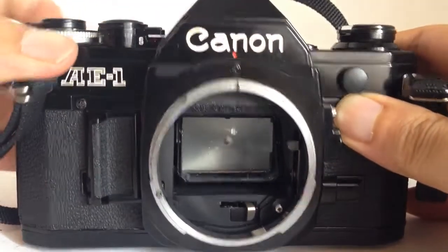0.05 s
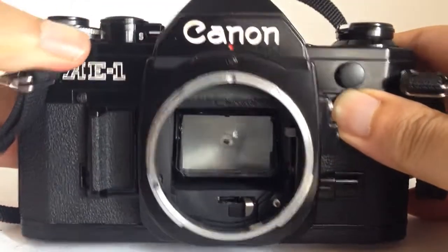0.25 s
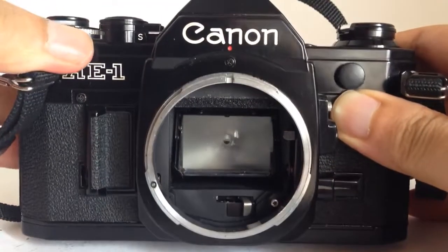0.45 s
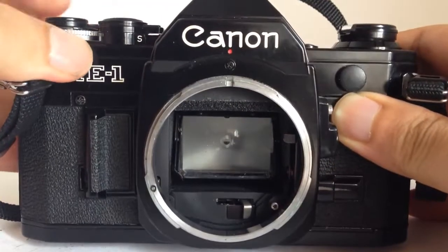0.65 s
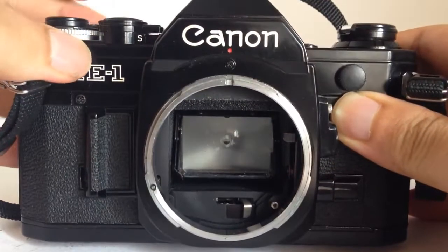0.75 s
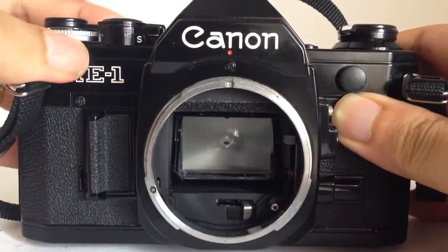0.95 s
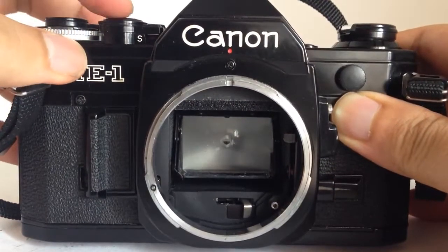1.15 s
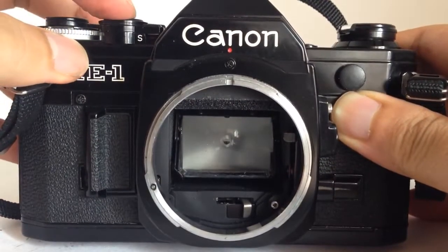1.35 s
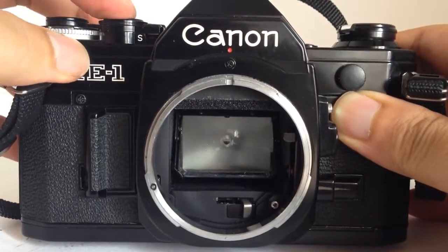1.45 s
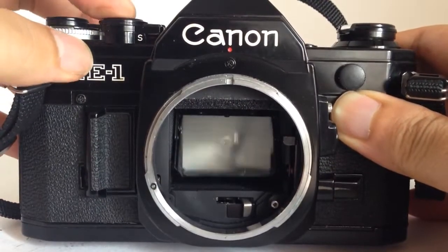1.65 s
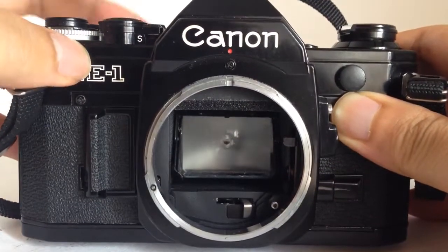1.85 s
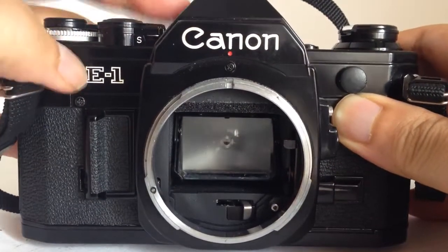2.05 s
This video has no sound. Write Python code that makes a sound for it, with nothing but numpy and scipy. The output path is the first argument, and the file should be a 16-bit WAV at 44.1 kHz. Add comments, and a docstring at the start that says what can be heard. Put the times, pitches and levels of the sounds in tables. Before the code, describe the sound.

A mechanical film camera is wound and fired, close up in a quiet room. After soft finger handling, the lever ratchets from 0.2 seconds to a hard stop at 0.45, leaving a faint spring ring. It clacks back at 0.75. Light taps follow, then a tiny button click at 1.25. At 1.65 the mirror and shutter snap sharply with a slight hollow thump, rattling until about 1.9.

```python
"""A mechanical film camera is wound and fired close to the microphone in a small quiet room.
Fingers handle the body, then the advance lever leaves its detent and drives ratcheting gears to their stop.
The lever springs back with a clack, fingers tap, and the button clicks down. Last, mirror and shutter snap
and rattle, and the button comes up. Each impact excites damped modes of the shell and the metal parts;
hard blows also set off a hollow boom and leave small springs singing."""
import sys
import numpy as np
from scipy import signal
from scipy.fft import rfft, irfft
from scipy.io import wavfile

SR = 44100
rng = np.random.default_rng(int(sys.argv[2]) if len(sys.argv) > 2 else 0)


def unload_audio(sound):
    """Save the sound as a 16-bit wav file, at the path given as the first command line argument."""
    columns = np.transpose(np.atleast_2d(sound))
    # keep every value between -1 and 1, then stretch to whole-number steps
    steps = np.round(np.clip(columns, -1, 1) * 32767)
    wavfile.write(sys.argv[1], SR, steps.astype(np.int16))


N = 92610
TIME = np.arange(N) / SR
ATTACK_S = 0.00031
# friction spectrum of fingers and gears: (frequency [Hz], relative density [dB])
RUBBING_SPECTRUM = [(60, -19.5), (290, 1), (450, -8), (720, -4.5), (1600, -10), (2250, -0.5), (3050, -12.5),
                    (4000, -5.5), (7000, -12.5), (8400, -5), (9600, -14), (15000, -15)]


def amp(db):
    """Amplitude ratio: a factor of ten for every 20 dB."""
    return 10 ** (np.asarray(db) / 20)


def unit(x):
    """Normalisation to an rms of 1."""
    return x / np.sqrt(np.mean(x ** 2) + 1e-20)


def read(points, hz):
    """Interpolation along a logarithmic frequency axis."""
    f, value = np.transpose(points)
    return np.interp(np.log(hz + 1), np.log(f + 1), value)


def shaped(x, spectrum):
    """Linear filtering: the spectrum of x is multiplied by a gain curve."""
    return irfft(rfft(x) * amp(read(spectrum, np.fft.rfftfreq(N, 1 / SR))), N)


def add(mix, s, sound):
    """Superposition: a sound joins the mix at time s."""
    part = mix[max(round(s * SR), 0):][:len(sound)]
    part += sound[:len(part)]


def air():
    """Background noise: the still room gives a random signal that is strongest in the bass."""
    spectrum = [(25, -19.5), (86, 0), (180, -13), (350, -15), (650, -26), (6000, -26), (15000, -28.5)]  # (frequency [Hz], relative density [dB])
    levels = [(1.6, -65.5), (1.95, -69)]  # (time [s], level [dB])
    noise = unit(shaped(rng.standard_normal(N), spectrum))
    return amp(np.interp(TIME, *np.transpose(levels))) * noise


def room(x, tail_db=-12.5, delay_s=.004):
    """Reverberation: a short diffuse tail follows the direct sound, its highest treble dying first."""
    decay_times = [(100, 0.26), (1000, 0.19), (6000, 0.21), (15000, 0.06)]  # (frequency [Hz], t60 [s])
    hz, t, noise = signal.stft(rng.standard_normal(SR // 2), SR, nperseg=256)
    t60 = read(decay_times, hz)[:, None]
    tail = noise * amp(tail_db - 60 * t / t60) * np.sqrt(2 * np.log(1000) / (t60 * SR))
    response = signal.istft(tail, SR, nperseg=256)[1]
    reverb = np.zeros(N)
    add(reverb, delay_s, signal.fftconvolve(x, response))
    return x + reverb


def ring(hz, db, t60, rise_s, phase=0):
    """Damped oscillation: one mode builds up, then decays exponentially."""
    t = TIME[:int(min(t60 * 1.2, 2) * SR)]
    return amp(db - 60 * t / t60) * (1 - np.exp(-t / rise_s)) * np.sin(2 * np.pi * (hz * t + phase))


def cluster(hz, db, t60, rise_s, count=20, spread_hz=240):
    """Beating: many close modes interfere and blur the pitch."""
    close_hz = hz + spread_hz * rng.triangular(-1, 0, 1, count)
    sound = sum(ring(f, db, t60, rise_s, rng.random()) for f in close_hz)
    return unit(sound) * np.std(ring(hz, db, t60, rise_s))


def click(contact_s, band_dbs):
    """Modal overlap: a brief contact shakes shell modes so dense that they decay as bands of noise."""
    bands = [(302, 746, 0.048), (907, 3200, 0.039), (2980, 8300, 0.026), (8930, 15000, 0.021)]  # low, middle, high, top: (lower edge [Hz], upper edge [Hz], t60 [s])
    t, out = TIME[:4096], 0
    for (lo, hi, t60), db in zip(bands, band_dbs):
        bandpass = signal.butter(3, [lo, hi], "band", fs=SR, output="sos")
        envelope = np.minimum(t / ATTACK_S, 1) * amp(-60 * np.maximum(t - contact_s, 0) / t60)
        burst = signal.sosfilt(bandpass, rng.standard_normal(2 * len(t)))[len(t):] * envelope
        rms = np.sqrt(np.sum(burst ** 2) / (.008 * SR))  # energy spread over 8 ms
        out = out + amp(db) * burst / rms
    return out


def blows(impacts, top_db, modes=(), t60=0.03, detune=0):
    """Impact excitation: the shell clicks into the room; the part's own modes are heard only close up."""
    # impacts: (time [s], contact [s], low band [dB], middle band [dB], high band [dB])
    # modes: (frequency [Hz], level [dB]); this level and top_db are relative to the high band
    shell_resonances = [(350, -3.5), (480, -9.5), (700, 1), (1150, 4.5), (1550, -2), (2200, 4.5),
                        (3000, -7.5), (4200, -3.5)]  # (frequency [Hz], gain [dB])
    clicks, rings = np.zeros((2, N))
    for s, contact_s, low_db, middle_db, high_db in impacts:
        add(clicks, s, click(contact_s, (low_db, middle_db, high_db, high_db + top_db)))
        for hz, db in modes:
            ring_s = t60 * (1000 / hz) ** 0.19  # t60 holds at 1 kHz; higher modes die sooner
            struck_hz = hz * (1 + detune * rng.uniform(-1, 1))  # detuned by where the blow lands
            add(rings, s, cluster(struck_hz, high_db + db, ring_s, contact_s / 4))
    return room(shaped(clicks, shell_resonances)) + rings


def friction(levels, spectrum, clump_db, ticks_per_s=15000, spread_db=2, clump_s=.002):
    """Stick-slip friction: tiny uneven ticks bunch up as teeth and sliding parts catch and slip."""
    sizes = amp(spread_db * np.minimum(rng.exponential(1, N), 4))
    ticks = sizes * rng.choice([-1, 1], N) * (rng.random(N) < ticks_per_s / SR)
    slip_times = np.arange(0, N / SR, clump_s)
    slip_strengths = np.minimum(rng.standard_normal(len(slip_times)), 2)
    clumps = amp(clump_db * np.interp(TIME, slip_times, slip_strengths))
    envelope = amp(np.interp(TIME, *np.transpose(levels), left=-140, right=-140))
    return room(envelope * unit(shaped(ticks * clumps, spectrum)))


def springs():
    """Free vibration: small springs and the back panel ring on after the hardest blows."""
    tones = [(0.446, 413, -36.5, .22), (0.446, 1125, -66, 4), (1.67, 640.5, -71, 4.5)]  # (time [s], frequency [Hz], level [dB], t60 [s])
    out = np.zeros(N)
    for s, hz, db, t60 in tones:
        add(out, s, ring(hz, db, t60, ATTACK_S))
    return out


def boom():
    """Resonance: each jolt of the whole body swells into a hollow low note and its overtone; the first row
    gives a low note already sounding as the scene begins."""
    jolts = [(.003, -40.5, -47.5), (0.082, -35.5, -47.5), (.146, -45.5, -42.5), (0.189, -39, -38),
             (0.291, -43, -51), (0.4343, -25, -25), (0.724, -39, -37.5), (0.7508, -28, -47),
             (0.9054, -39.5, -67.5), (0.976, -39, -55), (1.667, -36, -42.5), (1.711, -40.5, -30),
             (1.743, -30.5, -41), (1.7942, -30, -39.5), (1.8322, -34, -42.5)]  # (time [s], boom level [dB], overtone level [dB])
    out = np.zeros(N)
    for s, boom_db, overtone_db in jolts:
        add(out, s, ring(hz=137.6, db=boom_db, t60=.12, rise_s=.0058))
        add(out, s, ring(hz=133.25, db=boom_db - 16.5, t60=.42, rise_s=.0058))  # lingers in the room
        add(out, s, ring(hz=266.6, db=overtone_db, t60=.1, rise_s=.001))
    return out


def fingers():
    """Contact noise: light touches tap and rub the body."""
    taps = [(.0385, 0.00087, -46, -43.5, -78), (.1452, 0.0011, -38.5, -42.5, -39.5),
            (.160, 0.00083, -53.5, -46.5, -50), (.6725, 0.0016, -59, -48.5, -45),
            (.7112, 0.0053, -46, -45.5, -66), (.897, 0.0023, -53, -54, -64.5),
            (.971, 0.0053, -42, -50, -50), (1.950, 0.0025, -65.5, -57.5, -50.5)]  # (time [s], contact [s], low [dB], middle [dB], high [dB])
    rubbing = [(0, -57), (.064, -53.5), (.11, -56.5), (.185, -55)]  # (time [s], level [dB])
    return blows(taps, top_db=-16.5) + friction(rubbing, RUBBING_SPECTRUM, clump_db=4)


def button():
    """Impact excitation: the shutter button rings faintly going down and coming up."""
    strokes = [(1.2592, 0.00044, -68, -69, -52), (1.9295, 0.00051, -80, -61.5, -50.5)]  # (time [s], contact [s], low [dB], middle [dB], high [dB])
    modes = [(6150, 11.2)]  # (frequency [Hz], relative level [dB])
    return blows(strokes, top_db=-2.5, modes=modes)


def winding():
    """Impact and friction: the lever leaves its detent, pawls catch and the gears run into their stop."""
    # impacts: (time [s], contact [s], low [dB], middle [dB], high [dB])
    detent = [(.0803, 0.00035, -47, -46.5, -56.5)]
    pawls = [(.1748, 0.0031, -52, -55, -40), (.2180, 0.0055, -54, -41.5, -27),
             (.2293, .0006, -63, -42, -25.5), (.2592, 0.001, -39.5, -40.5, -28),
             (.353, 0.0028, -60, -57.5, -51.5), (.4243, .0006, -45.5, -52.5, -25.5),
             (.4305, 0.0024, -37, -43.5, -22.5), (.4358, 0.0039, -29.5, -30, -19)]
    end_stop = [(.4429, 0.0013, -32.5, -31, -14.5)]
    # resonances: (frequency [Hz], relative level [dB])
    detent_modes = [(2820, 18.5)]
    gear_modes = [(2215, -7.5), (3850, -7.5), (4300, -0.5), (4930, -5.5), (9750, 0.5)]
    turning = [(.17, -51.5), (.21, -47), (.25, -44), (.30, -65), (.34, -70), (.37, -49), (.383, -42),
               (.42, -35), (.448, -25.5), (.49, -61.5)]  # (time [s], level [dB])
    return (blows(detent, top_db=0, modes=detent_modes, t60=0.034)
            + blows(pawls, top_db=-6.5)
            + blows(end_stop, top_db=-3.5, modes=gear_modes, t60=0.054)
            + friction(turning, RUBBING_SPECTRUM, clump_db=3.5))


def lever_return():
    """Elastic restoring force: the lever springs back, sliding until it strikes its rest and rings."""
    impact = [(.7442, 0.002, -37, -32, -20)]  # (time [s], contact [s], low [dB], middle [dB], high [dB])
    modes = [(1120, 4), (2050, 2.5), (4520, 6.5), (5250, 8), (6780, 12.5), (7760, 12), (9900, 6),
             (11900, 3)]  # (frequency [Hz], relative level [dB])
    sliding = [(.655, -60.5), (.70, -58), (.748, -28), (.79, -67)]  # (time [s], level [dB])
    spectrum = [(59, -29), (100, 1.5), (733, -20.5), (1150, 0.5), (1590, -23.5), (2180, -7.5), (2990, -18),
                (6910, -5), (15000, -31.5)]  # (frequency [Hz], relative density [dB])
    return blows(impact, top_db=-6.5, modes=modes, t60=.02) + friction(sliding, spectrum, clump_db=1)


def shutter():
    """Impact and rebound: the mirror flies up, the curtains slide and stop, the mirror drops and bounces."""
    # impacts: (time [s], contact [s], low [dB], middle [dB], high [dB])
    release_and_mirror = [(1.646, 0.00079, -79.5, -67.5, -55.5), (1.666, 0.0011, -67.5, -45.5, -21),
                          (1.668, 0.0023, -34, -35, -14.5), (1.678, 0.0013, -65.5, -39.5, -32.5)]
    stops_and_bounces = [(1.7053, 0.0018, -59, -41, -29.5), (1.7125, 0.0028, -50, -45, -37),
                         (1.7328, 0.004, -42, -40.5, -26), (1.7932, 0.00049, -36, -44, -27),
                         (1.8082, 0.00082, -53, -63, -33), (1.838, 0.00059, -62, -49, -37),
                         (1.8665, 0.0013, -58.5, -69, -49.5), (1.886, 0.0011, -75, -85, -60)]
    modes = [(2225, 0.5), (3850, 1.5), (6000, 1), (7450, 2), (8100, 6)]  # (frequency [Hz], relative level [dB])
    curtain_travel = [(1.656, -55), (1.68, -45), (1.70, -42), (1.733, -30.5), (1.757, -47), (1.80, -42),
                      (1.844, -46), (1.862, -60)]  # (time [s], level [dB])
    curtain_spectrum = [(59, -21), (100, -10), (482, -11), (1260, -14.5), (1530, -12.5), (9260, -10.5),
                        (15000, -22.5)]  # (frequency [Hz], relative density [dB])
    return (blows(release_and_mirror, top_db=-2.5, modes=modes, t60=0.016)
            + friction(curtain_travel, curtain_spectrum, clump_db=3)
            + blows(stops_and_bounces, top_db=-4, modes=modes, detune=0.17))


def scene():
    """Superposition: the camera's sounds and the still air of the room sum to one channel."""
    camera = fingers() + button() + winding() + lever_return() + shutter() + boom() + springs()
    return (camera + air())[None]


def record(dry):
    """Band limiting: a low-pass filter removes the highest treble."""
    lowpass = signal.firwin(255, cutoff=15500, window=("kaiser", 8), fs=SR)
    return signal.oaconvolve(dry, lowpass[None], "same")


dry = scene()
out = record(dry)
unload_audio(out)
```